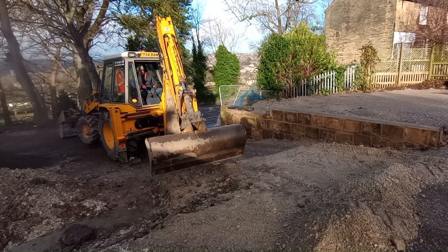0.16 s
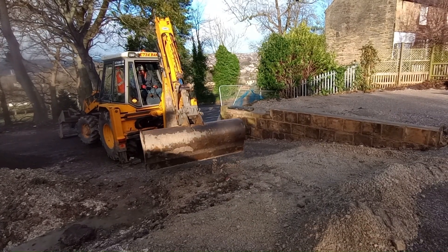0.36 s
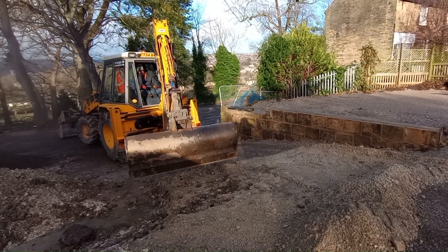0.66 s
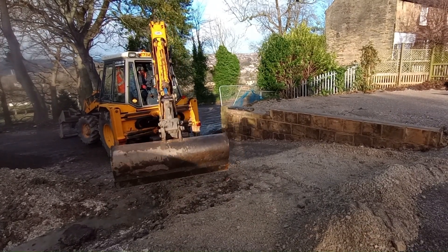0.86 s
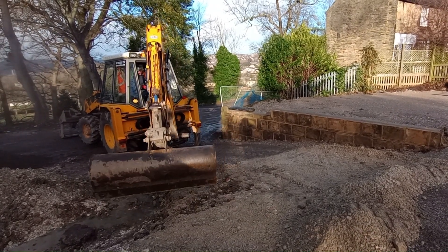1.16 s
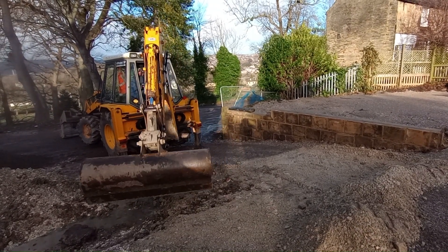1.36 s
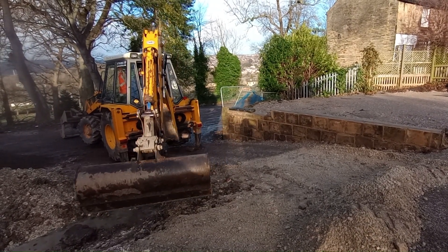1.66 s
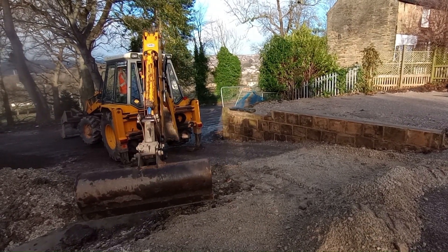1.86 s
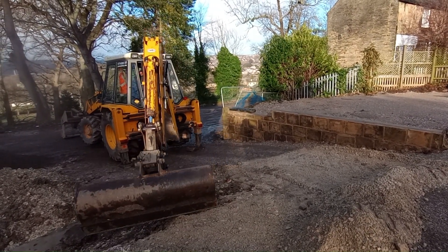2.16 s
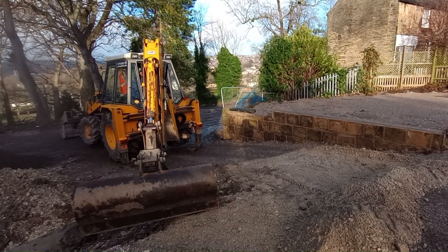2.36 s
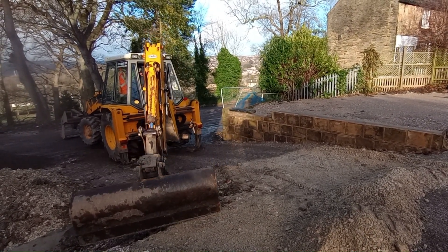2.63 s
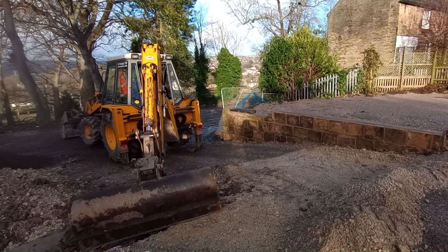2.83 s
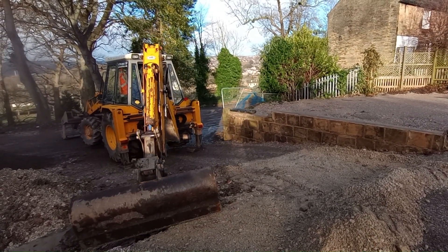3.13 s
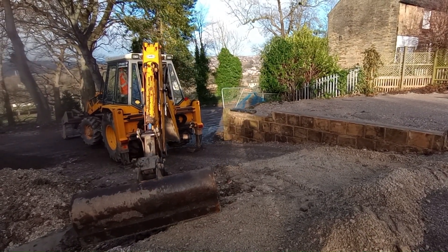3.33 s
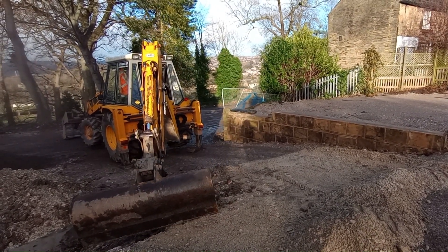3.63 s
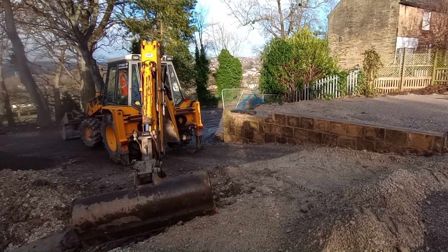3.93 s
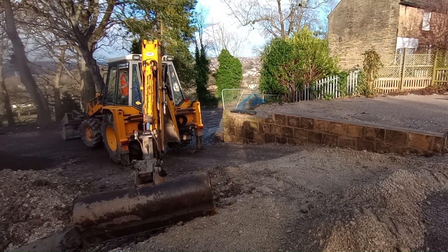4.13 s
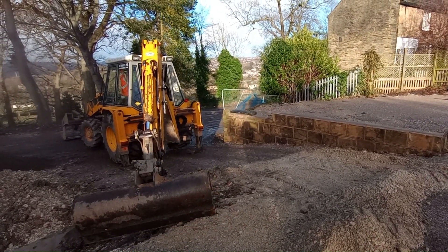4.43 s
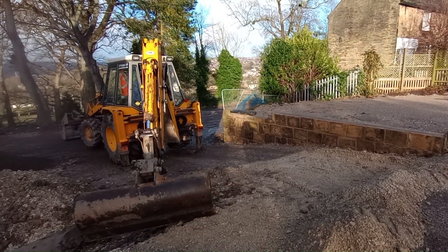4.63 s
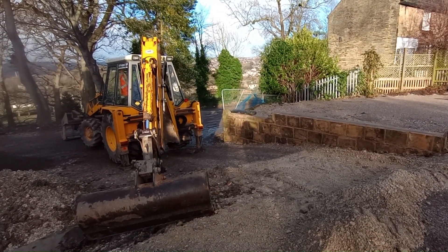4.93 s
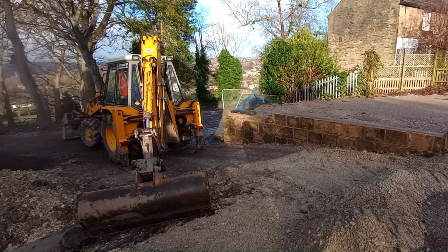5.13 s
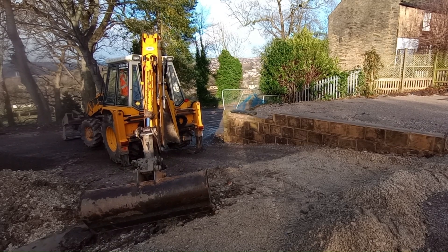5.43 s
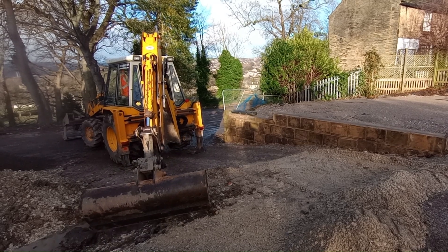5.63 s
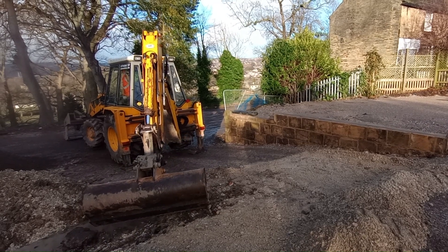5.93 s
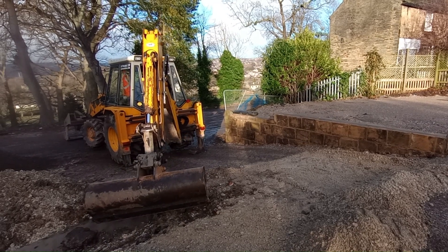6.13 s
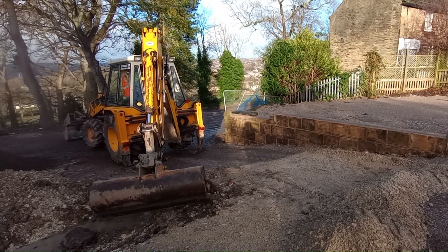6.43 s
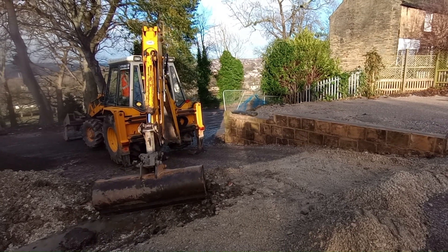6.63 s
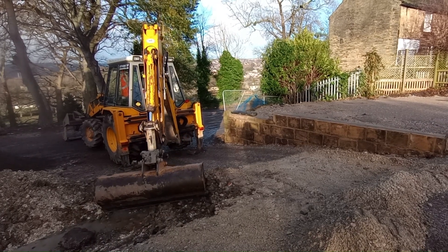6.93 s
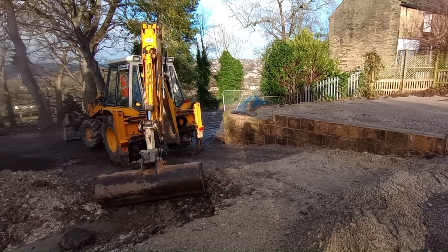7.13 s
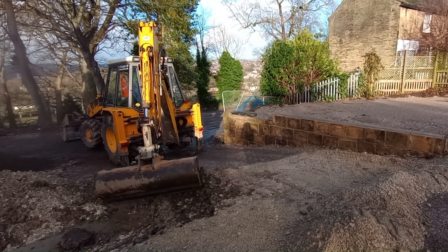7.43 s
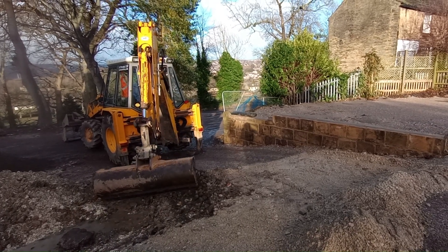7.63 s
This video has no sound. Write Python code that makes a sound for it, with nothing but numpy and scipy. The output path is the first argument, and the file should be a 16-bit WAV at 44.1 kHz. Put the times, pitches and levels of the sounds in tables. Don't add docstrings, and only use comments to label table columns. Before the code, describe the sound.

Outdoors, a digger's diesel drones steadily with swelling hydraulic whine as its bucket drags through stony ground with hollow knocks, crunches and gritty snaps.

```python
import sys
import numpy as np
from scipy import signal
from scipy.fft import rfft, irfft, next_fast_len
from scipy.io import wavfile
from scipy.ndimage import uniform_filter1d

SR = 44100
rng = np.random.default_rng(int(sys.argv[2]) if len(sys.argv) > 2 else 0)


def gain_from_db(level_db):
    decades = np.asarray(level_db, float) / 20
    return 10 ** decades


def store_wav(level_fs):
    pcm = np.round(np.clip(np.atleast_2d(level_fs), -1, 1) * 32767)
    wavfile.write(sys.argv[1], SR, pcm.T.astype(np.int16))


N = 343098

# time in seconds, cylinder firings per second in Hz.
ENGINE_SPEED = [(0.0, 47.3), (0.4, 47.3), (0.9, 48.5), (1.3, 48.0), (2.1, 48.75), (2.45, 47.75),
                (3.0, 49.6), (3.6, 49.5), (4.3, 47.6), (5.1, 47.35), (5.4, 47.9), (6.0, 48.15),
                (6.3, 47.75), (6.9, 48.05), (7.78, 49.0)]
# multiple of the firing rate, rms level in dB.
ENGINE_TONES = [(1, -44), (2, -48), (3, -45.5), (4, -46.5), (7, -52), (8, -54), (10.6, -56), (13.5, -54),
                (14, -50.5), (16, -59), (30.3, -56)]
# time in seconds, level in dB.
CLATTER = [(0.0, -41.5), (0.3, -45), (1.13, -39.5), (1.54, -44.5), (1.86, -40.5), (2.27, -46.5),
           (2.64, -39), (3.25, -45.5), (3.75, -41), (4.12, -41), (5.09, -42), (5.63, -40), (5.92, -40),
           (6.3, -41), (7.06, -39), (7.78, -41)]
# frequency in Hz, level in dB per Hz.
CASING_COLOUR = [(41, -27.5), (70, 4.5), (378, -2), (545, -7), (870, -1), (1000, -5), (1110, -5),
                 (1770, -9.5), (1960, -13), (2710, -17.5), (4600, -39.5), (9000, -56.5), (11700, -99),
                 (19800, -120)]
# pitch in Hz, width in Hz, level over the clatter in dB.
PANELS = [(188, 6, -1), (379.7, 3.8, -9.5), (780, 40, -14), (835, 13, -10), (880, 25, -14.5),
          (1120, 25, -13.5), (1310, 72, -15), (1451, 28, -10.5), (1517, 23, -15.5), (1753, 6.3, -18),
          (1917, 46, -20), (2260, 56, -27.5), (2410, 20, -26.5)]
# start in seconds, end in seconds, tone number, gain in dB.
VALVES = [
    (1.5, 2.35, 0, 5),
    (2.8, 4.65, 0, 6.5),
    (3.8, 4.65, 0, 4.5),
    (5.4, 7.9, 0, 4.5),
    (1.5, 2.35, 1, 11),
    (2.8, 3.95, 1, 11),
    (.7, 1.9, 2, 7),
    (2.8, 4.65, 2, 8),
    (5.4, 7.9, 2, 4.5),
]
# time in seconds, level in dB.
DRAG = [(0, -40.5), (1.86, -35.5), (2.32, -40.5), (2.6, -45), (2.9, -32.5), (3.23, -35.5), (3.6, -33),
        (3.96, -37.5), (4.35, -32), (4.64, -39), (5.03, -36), (5.4, -28), (5.9, -30.5), (6.5, -34.5),
        (6.575, -44), (6.62, -26.5), (7.28, -38), (7.78, -32.5)]
# middle in seconds, length in seconds, scrape in dB, grit in dB.
JOLTS = [(0.126, 0.17, -30, -57), (2.2, 0.13, -32.5, -48.5), (2.48, 0.33, -31.5, -52.5),
         (2.657, 0.031, -35, -35.5), (2.755, 0.15, -25, -44), (3.68, 0.022, -19, -41),
         (3.763, 0.061, -26, -35.5), (3.83, 0.08, -26, -38), (4.39, 0.038, -24, -37.5),
         (4.505, 0.29, -34, -52), (4.736, 0.097, -28, -47), (4.806, 0.067, -21.5, -48),
         (4.957, 0.24, -27.5, -54.5), (5.49, 0.11, -31, -45), (5.696, 0.14, -26.5, -65),
         (6.175, 0.083, -41, -50), (6.354, 0.88, -28.5, -47.5), (6.709, 0.095, -26.5, -62),
         (7.315, 0.11, -24.5, -47), (7.488, 0.18, -30, -46), (7.62, 0.22, -27, -46.5)]
# frequency in Hz, level in dB per Hz.
GRAVEL_COLOUR = [(88, -30), (150, -26.5), (215, -30.5), (372, -1.5), (1320, -9), (2100, -14), (2450, -12.5),
                 (3330, -22), (9000, -65.5), (11700, -102.5), (19800, -120)]
# pitch in Hz, width in Hz, level in dB.
BUCKET_RINGS = [(530, 720, 5), (630, 63, -3.5), (884, 64, 2), (1105, 78, 1.5), (1290, 240, 0.5),
                (1560, 170, -5.5), (2710, 210, -16.5)]
# time in seconds, peak in dB, ring in Hz, gritty edge in dB.
KNOCKS = [(2.651, -8.5, 895, -26), (2.6562, -14.5, 1450, -7), (2.666, -15, 600, -8), (2.775, -20, 870, -31),
          (2.7905, -39.5, 2280, 19), (2.805, -2, 610, -36), (2.807, -7, 1350, -30), (2.817, -13, 890, -29),
          (2.863, -15, 1030, -21), (2.867, -15, 604, -24), (3.41, -20.5, 610, -16),
          (3.508, -12.5, 503, -33), (3.67, -15.5, 1290, -11), (3.685, -15.5, 950, -3),
          (3.8174, -12, 614, -7), (3.84, -5.5, 940, -16), (3.857, -13.5, 410, -35),
          (3.888, -11.5, 1070, -17), (4.39, -20, 1420, -14), (4.694, -16.5, 1230, -12),
          (4.714, -13, 835, -23), (4.741, -13, 970, -24), (4.797, -12, 1120, -17), (4.802, -9, 530, -31),
          (4.811, -10.5, 536, -37), (5.073, -12.5, 1010, -20), (5.15, -16.5, 670, -39),
          (5.159, -16, 1010, -35), (5.406, -15, 610, -16), (5.493, -19, 810, -22),
          (5.528, -8.5, 1290, -10.5), (6.042, -13.5, 796, -19), (6.229, -10.5, 735, -22),
          (6.289, -12.5, 880, -13), (6.4058, -15, 930, -21), (6.596, -9, 945, -17)]
# time in seconds, peak in dB, ring in Hz.
PEBBLES = [(0.465, -24, 980), (2.721, -22.5, 573), (3.745, -22, 454), (3.784, -19, 706), (3.835, -14, 410),
           (4.108, -32, 820), (4.362, -24, 630), (4.405, -35, 1230), (4.535, -18.5, 890), (4.673, -23, 810),
           (4.88, -20, 700), (4.931, -21, 680), (5.058, -18.5, 790), (5.095, -17.5, 645),
           (5.244, -20.5, 666), (5.352, -20.5, 890), (5.57, -16, 880), (5.699, -24, 1090),
           (5.734, -15.5, 700), (5.849, -24, 490), (5.928, -16, 620), (5.949, -21, 690), (6.013, -21, 496),
           (6.122, -28, 453), (6.202, -17.5, 493), (6.27, -16, 900), (6.315, -22, 950), (6.33, -16, 470),
           (6.349, -15.5, 760), (6.37, -29, 674), (6.462, -17.5, 497), (6.501, -20.5, 472),
           (6.695, -21, 885), (6.73, -19, 607), (6.786, -28, 1160), (6.85, -18.5, 880), (6.898, -20, 395),
           (6.957, -29, 440), (7.035, -16.5, 660), (7.247, -25, 670), (7.368, -19.5, 770),
           (7.486, -22, 494), (7.612, -13.5, 890), (4.459, -21, 1200), (4.466, -23, 900),
           (5.372, -19.5, 517), (5.617, -25, 498), (5.773, -19.5, 600), (6.788, -17.5, 700),
           (7.072, -25, 593)]
# time in seconds, peak in dB.
CHIPS = [(4.4249, -48), (4.76, -28), (4.8799, -49), (5.202, -30), (5.243, -40), (5.3299, -46),
         (5.4321, -36), (5.5777, -40), (5.8536, -22.5), (5.908, -28), (6.122, -30), (6.1746, -26),
         (6.262, -26.5), (4.455, -41), (5.257, -32), (5.2822, -40), (6.1902, -31), (6.2141, -36),
         (6.3249, -38), (6.4336, -43), (7.48, -40), (7.6788, -38), (2.764, -32), (0.519, -32), (3.835, -24),
         (3.845, -21.5), (3.853, -24), (4.796, -33), (4.805, -33), (4.7185, -24), (5.7, -42), (5.7347, -29),
         (6.459, -27), (3.769, -33), (3.7553, -24), (6.3471, -42), (6.5232, -33), (6.64, -41),
         (6.6808, -35), (6.88, -41), (7.188, -47), (7.3664, -35), (7.4645, -47), (7.5847, -33),
         (7.6366, -49)]
# time in seconds, peak in dB.
CRUNCHES = [(3.7447, -40), (3.767, -42), (3.7896, -39), (3.846, -42), (3.855, -50), (4.365, -39),
            (4.3863, -37), (4.3915, -40), (4.407, -44), (4.6716, -49), (4.759, -44), (4.8801, -41),
            (5.2024, -48), (5.407, -46), (5.4324, -43), (5.4783, -34), (5.6838, -48), (5.7172, -44),
            (5.7357, -44), (5.8534, -44), (6.1223, -43), (6.1737, -40), (6.1977, -38), (6.4246, -50),
            (6.4606, -43), (6.6401, -41), (6.7684, -50), (6.8497, -46), (7.1874, -40), (7.6126, -39)]
# time in seconds, peak in dB, lower part in dB.
SNAPS = [(2.655, -65.5, 29), (2.793, -72, 21), (3.685, -53, 12), (3.7532, -48, 6), (3.8313, -55, 23),
         (3.888, -50.5, 15), (4.3647, -55, 22), (4.3915, -57, -1), (4.455, -53, 12), (4.693, -62, 12),
         (4.722, -52, 25), (4.789, -56, 7), (5.3473, -48.5, 8), (5.459, -45, 8), (5.5038, -48.5, 29),
         (5.527, -51, 31), (5.538, -41.5, 10), (5.6313, -55, 16), (5.846, -61, 16), (6.0428, -48.5, -2),
         (6.166, -53, 11), (6.1828, -48.5, 12), (6.2124, -52, 3), (6.29, -50.5, 10), (6.456, -49.5, 20),
         (6.696, -33.5, 16), (6.708, -42.5, 8), (7.3085, -39, 15), (7.336, -45, 0), (7.4984, -42.5, 9)]
# time in seconds, peak in dB, lower part in dB.
MORE_SNAPS = [(0.798, -56.5, 1), (2.782, -52, 6), (3.8167, -55, 18), (3.8357, -49, 18), (4.402, -49, 12),
              (5.6401, -48, 6), (5.929, -55, 12), (6.142, -47.5, 6), (6.349, -57, 18), (6.3964, -58, 14),
              (6.5266, -57.5, 12), (6.5974, -54.5, 12), (6.883, -51, 20), (6.968, -55, 5), (7.1886, -58, 14),
              (7.3143, -43, 10), (7.4774, -57, 16), (7.584, -54.5, 14), (7.7368, -48.5, 5), (5.885, -51, 8),
              (5.911, -55, 5), (6.613, -51, 8), (6.662, -53, 2), (6.686, -52, 4), (6.725, -50.5, 0),
              (6.793, -52, 4), (7.2936, -56, 4), (7.754, -52, 2)]
# time in seconds, length in seconds, pitch in Hz, level in dB,
# second partial in dB.
SQUEAKS = [
    (3.666, 0.027, 1271, -26, -32),
    (7.583, 0.049, 640.5, -27.5, -25),
]
# time in seconds, peak in dB, pitch in Hz.
THUMPS = [(0.042, -18, 140), (0.071, -15, 115), (0.122, -14, 156), (0.647, -19, 153), (0.818, -21.5, 202),
          (1.045, -30, 151), (1.275, -19, 88.5), (1.689, -16, 101), (1.949, -20, 100.5), (2.065, -19, 129),
          (2.136, -17.5, 188), (2.318, -19.5, 138), (2.423, -8.5, 226), (2.503, -19.5, 175),
          (2.766, -20, 181), (2.886, -24, 108), (3.014, -18.5, 290), (3.824, -13.5, 138), (4.666, -17, 128),
          (4.72, -14.5, 117), (4.799, -10.5, 129), (5.188, -17, 146), (5.339, -20, 142), (5.405, -12, 139),
          (5.489, -14, 126), (5.528, -11.5, 153), (5.608, -19, 132), (5.761, -15.5, 169), (6.041, -20, 121),
          (6.142, -17, 147), (6.22, -14, 128), (6.353, -15, 137), (6.593, -27, 143), (6.722, -15, 126),
          (6.832, -16, 139), (6.895, -14, 123), (7.03, -18, 98), (7.419, -21, 98), (7.537, -16, 169),
          (7.612, -18, 83.4)]
# time in seconds, level in dB, depth in octaves below the flutter.
BREEZE = [(0.0, -19.5, 1.4), (0.4, -33, 0.18), (0.8, -27, 0.62), (1.3, -38, 2), (1.55, -30, 1.16),
          (2.0, -28, 1.3), (2.3, -29, 0.68), (2.95, -30, 0.72), (3.2, -51, 0.69), (4.3, -47, 1.4),
          (4.6, -39.5, 1.2), (5.3, -28.5, 0.42), (5.9, -31, 0.29), (6.6, -32.5, 0.36), (7.2, -30, 1.54),
          (7.78, -26, 0.71)]
# middle in seconds, length in seconds, level in dB,
# depth in octaves below the flutter.
GUSTS = [(0.282, 0.07, -27, 1.3), (0.13, 0.2, -20.5, 0.67), (0.622, 0.36, -30, 1.36),
         (0.71, 0.13, -28, 2.6), (0.837, 0.16, -34, 0.2), (1.11, 0.3, -24.5, 0.51),
         (1.356, 0.23, -20.5, 0.6), (1.44, 0.044, -45, 1.1), (1.718, 0.14, -25, 1.2),
         (2.07, 0.068, -62, 1.1), (2.225, 0.19, -24.5, 1.7), (2.478, 0.29, -21, 0.084),
         (2.923, 0.16, -25, 1.34), (3.648, 0.11, -30.5, 2.3), (3.84, 0.28, -22, 0.25),
         (4.01, 0.41, -42, 1.5), (4.518, 0.19, -28, 0.45), (4.74, 0.11, -26.5, 0.46),
         (4.826, 0.15, -21.5, 0.27), (4.983, 0.27, -24, 1), (5.46, 0.36, -28.5, 0.27),
         (5.7, 0.39, -28, 0.25), (6.277, 0.56, -31.5, 0.52), (6.405, 0.31, -31, 0.1),
         (6.61, 0.059, -26, 0.34), (6.875, 0.67, -32, 0.47), (7.054, 0.06, -26, 1.1),
         (7.373, 0.096, -45, 2.5), (7.622, 0.2, -30.5, 0.66)]
# frequency in Hz, level in dB per Hz.
HISS_COLOUR = [(4500, -10.5), (6500, -16), (9000, -2), (13000, 2.5), (15700, 1.5)]
# middle in seconds, length in seconds,
# level over the hiss in dB.
SPRAYS = [(1.05, 0.92, 6.5), (4.52, 0.22, 7), (4.735, .07, 4), (4.8, .05, 4), (4.96, 0.11, 3),
          (5.27, .12, 0), (5.48, .08, 7), (5.54, .05, 5), (6.18, .1, 3), (6.705, 0.046, 2), (6.88, .1, 3),
          (7.312, .04, 6), (7.585, .08, 3)]


def engine(gate=0.26, knock_s=0.014, clatter_db=7.5, follow=0.46):
    turns = np.cumsum(curves(ENGINE_SPEED)[0]) / SR
    level_db = curves(CLATTER)[0]

    def tone(order, db):
        loudness = np.sqrt(2) * gain_from_db(db + 1.5 * wander(4))
        return loudness * np.sin(2 * np.pi * (order * turns + rng.random()))

    exhaust = sum(tone(order, db) for order, db in ENGINE_TONES)
    pump = sum(tone(order, db) for order, db in zip((5, 6, 10), valves()))

    cylinder = gain_from_db([-13.5, -25.5, -17.5, -4.0])[turns.astype(int) % 4]
    dying = np.exp(-(turns % 1) / (49 * knock_s))
    flare = 1 - gate + gate * 2 * cylinder * dying
    shaking = flare * rng.standard_normal(N)
    casing = evened(colour(shaking, CASING_COLOUR))
    flex = 1 + .012 * wander(1.5)
    for hz, width, db in PANELS:
        panel = resonate(shaking, hz * flex, width)
        panel = resonate(panel, hz * flex, 2 * width)
        casing = casing + gain_from_db(db - 7.0) * evened(panel)

    gain = gain_from_db(follow * (level_db - np.median(level_db)))
    return gain * exhaust + pump + gain_from_db(level_db + clatter_db) * casing


def valves(ramp_s=.3):
    t = np.arange(N) / SR
    levels = np.outer([-50.5, -52.5, -51], np.ones(N))
    for start, end, which, db in VALVES:
        nearest_end = np.minimum(t - start, end - t)
        levels[int(which)] += db * np.clip(nearest_end / ramp_s + .5, 0, 1)
    return levels


def scrape(per_s=600, spread_db=-0.5, clump_db=1.5, chink_db=-7, ring_db=-4, trim_db=-1.5, grit_db=-3):
    level, bright = bite()
    hits = rng.random(N) < per_s / SR
    blows = hits * gain_from_db(spread_db * np.minimum(rng.exponential(1, N), 3)) * rng.standard_normal(N)
    dug = np.clip(np.arange(N) / SR - 4.6 + 1, .3, 1)
    rough = 1.5 * (1 - dug) * rng.standard_normal(N) + .6 * rng.standard_normal(N)
    blows = (dug * evened(blows) + rough) * gain_from_db(clump_db * wander(35))

    rings = np.zeros(N)
    for hz, width, db in BUCKET_RINGS:
        ring = resonate(resonate(blows, hz, width), hz, 4 * width)
        rings += gain_from_db(db) * evened(ring)
    stones = evened(colour(blows, GRAVEL_COLOUR)) + gain_from_db(ring_db) * evened(rings)

    low = evened(band(stones, 280, 2000, order=4))
    grit = evened(band(stones, 2100, 6000, order=3))
    chink = resonate(blows, 2500 * 2 ** (.07 * wander(12)), 140)
    grit = evened(grit + gain_from_db(chink_db) * evened(chink))
    return gain_from_db(trim_db - 4.0) * level * low + gain_from_db(grit_db) * bright * grit


def bite(grit_below_db=-16):
    drag = gain_from_db(curves(DRAG)[0])
    jolts = sum(np.outer(gain_from_db(np.array(dbs)), swell(s, length)) for s, length, *dbs in JOLTS)
    return drag + filled(jolts[0]), gain_from_db(grit_below_db) * drag + filled(jolts[1])


def knocks(rise_s=0.00048, strike=1.0, t60=0.043, ring=0.31, edge_t60=0.02, ring_width=90):
    out, t = np.zeros(N), np.arange(5000) / SR
    push = -strike * np.exp(-((t - .0012) / .00018) ** 2)
    rise = 1 - np.exp(-t / rise_s)
    rows = [(*row, 1) for row in KNOCKS]
    rows += [(*row, -21, .25) for row in PEBBLES]
    for (s, db, hz, edge_db, hard), chance in zip(rows, rng.standard_normal((len(rows), 5000))):
        rattle = gain_from_db(-60 * t / t60) / (1 + hard) + .12 * gain_from_db(-60 * t / .15)
        blow = hard * push + chance * rise * rattle
        wide = band(blow, 0.45 * hz, 1.885 * hz, order=4)
        body = peaked(peaked(wide) + ring * peaked(resonate(wide, hz, ring_width)))
        thud_db = -24 - db + 0.1 * (db + 15)
        thud = gain_from_db(thud_db) * peaked(band(blow, 140, 369))
        tick = chance[::-1] * rise * gain_from_db(-60 * t / edge_t60)
        edge = peaked(band(tick, 2600, 3500) + 9.9 * resonate(tick, 2640, 220))
        add(out, s, gain_from_db(db) * (body + thud + gain_from_db(edge_db - 3.5) * edge))
    return out


def chips(per_s=50, crackle_db=1, spread_db=4, trim_db=-3, t60=0.018):
    hits = rng.random(N) < per_s / SR
    train = hits * gain_from_db(crackle_db + spread_db * np.minimum(rng.exponential(1, N), 3))
    train = train * bite()[1] * gain_from_db(1) * (np.arange(N) > 4.35 * SR)
    for s, db in CHIPS:
        train[round(s * SR)] = gain_from_db(db + trim_db)
    shape = signal.oaconvolve(train, gain_from_db(-60 * np.arange(900) / SR / t60))[:N]
    noise = shape * rng.standard_normal(N)
    return gain_from_db(-6.0) * band(noise, 3100, 3900) + gain_from_db(14.5) * band(noise, 570, 2025)


def crunch(t60=.014, trim_db=-3):
    out, t = np.zeros(N), np.arange(700) / SR
    shape = gain_from_db(-60 * t / t60) * (1 - np.exp(-t / .0003))
    for (s, db), chance in zip(CRUNCHES, rng.standard_normal((len(CRUNCHES), 700))):
        crack = band(chance * shape, 2600, 4330, order=3)
        add(out, s, gain_from_db(db + trim_db) * peaked(crack))
    return out


def snaps(rows):
    out, t = np.zeros(N), np.arange(600) / SR
    shape = gain_from_db(-60 * t / .009) * (1 - np.exp(-t / .0003))
    for (s, db, lower_db), chance in zip(rows, rng.standard_normal((len(rows), 600))):
        top = peaked(band(chance * shape, 7000, 16000, order=3))
        lower = peaked(band(chance * shape, 3000, 5500, order=3))
        add(out, s, gain_from_db(db - 12.0) * (top + gain_from_db(lower_db - 7.0) * lower))
    return out


def squeaks(jitter=0.064):
    out = np.zeros(N)
    for s, length, hz, db, second_db in SQUEAKS:
        size = round(length * SR)
        unsteady = evened(uniform_filter1d(rng.standard_normal(4000), 90))
        turns = np.cumsum(hz * (1 + jitter * unsteady))[:size] / SR
        partials = gain_from_db(db) * np.sin(2 * np.pi * turns) + gain_from_db(second_db) * np.sin(4 * np.pi * turns)
        add(out, s, signal.windows.tukey(size, .5) * partials)
    return out


def thumps(trim_db=-4, rise_s=0.0028, cycles=7):
    out, t = np.zeros(N), np.arange(6000) / SR
    for (s, db, hz), turn in zip(THUMPS, rng.random(len(THUMPS))):
        shape = (1 - np.exp(-t / rise_s)) * gain_from_db(-60 * t * hz / (2 * cycles))
        ring = shape * np.sin(2 * np.pi * (hz * t + turn))
        add(out, s, gain_from_db(db + trim_db) * peaked(ring))
    return out


def rumble(lump_db=1.0, lump_hz=20, boom_hz=132, trim_db=-5.0):
    def share(depth):
        return gain_from_db(-6 * np.subtract.outer([0, .9, 1.7, 2.4], depth) ** 2)

    breeze_db, breeze_depth = curves(BREEZE)
    gains = share(breeze_depth) * gain_from_db(breeze_db)
    gusts = sum(np.outer(gain_from_db(db) * share(depth), swell(s, length)) for s, length, db, depth in GUSTS)
    gains = gains + [filled(g) for g in gusts]

    eddies = rng.standard_normal(N) * gain_from_db(lump_db * wander(lump_hz))
    flutter = evened(band(eddies, 203.0, 369.0, order=2))
    boom = band(eddies, 99.0, 179.0, order=3)
    boom = evened(boom + .5 * resonate(boom, boom_hz, 34.0))
    deep = evened(band(eddies, 60.7, 106.0, order=3))
    early = np.clip(10 * (5 - np.arange(N) / SR), 0, 1)
    deepest = gain_from_db(-4.5) * early * evened(band(eddies, 36, 63, order=3))
    return gain_from_db(trim_db) * (gains * [flutter, boom, deep, deepest]).sum(axis=0)


def yard(x, t60=.3):
    t = np.arange(SR // 2) / SR
    echoes = rng.standard_normal(len(t)) * (rng.random(len(t)) < .05)
    tail = echoes * gain_from_db(-60 * t / t60) * (t > .006)
    return signal.oaconvolve(x, tail / np.linalg.norm(tail))[:N]


def chirps(hz=8990, length_s=.024, db=-73):
    out, t = np.zeros(N), np.arange(0, length_s, 1 / SR)
    for s in (6.664, 7.052):
        add(out, s, gain_from_db(db) * signal.windows.tukey(len(t), .5) * np.sin(2 * np.pi * hz * t))
    return out


def hiss(level_db=-84, follow=.6, spray_per_grit=0.23):
    gain_db, grit = curves(CLATTER)[0], bite()[1]
    air = gain_from_db(level_db + follow * (gain_db - np.median(gain_db)) + 1.1 * wander(6))
    air = air * (grit / np.median(grit)) ** spray_per_grit
    air = air * gain_from_db(filled(sum(db * swell(s, length) for s, length, db in SPRAYS)))
    return air * evened(colour(rng.standard_normal(N), HISS_COLOUR))


def evened(x):
    return x / np.sqrt(np.mean(x ** 2) + 1e-20)


def peaked(x):
    return x / abs(x).max()


def curves(rows):
    s, *columns = np.transpose(rows)
    return [np.interp(np.arange(N) / SR, s, c) for c in columns]


def swell(middle, length):
    t = np.arange(N // 64 + 1) * 64 / SR
    return np.cos(np.pi * np.clip((t - middle) / length, -.5, .5)) ** 2


def filled(x):
    return np.interp(np.arange(N) / 64, np.arange(len(x)), x)


def wander(hz):
    steps = rng.standard_normal(N // 64 + 2)
    smooth = signal.sosfiltfilt(signal.butter(2, hz, fs=SR / 64, output="sos"), steps)
    return filled(evened(smooth))


def colour(x, points):
    f, db = np.transpose(points)
    size = next_fast_len(len(x))
    hz = np.fft.rfftfreq(size, 1 / SR) + 1
    gain = gain_from_db(np.interp(np.log(hz), np.log(f), db, left=-90, right=-90))
    return irfft(rfft(x, size) * gain, size)[:len(x)]


def band(x, lo_hz, hi_hz, order=2):
    edges = [lo_hz, min(hi_hz, .49 * SR)]
    return signal.sosfilt(signal.butter(order, edges, "bandpass", fs=SR, output="sos"), x)


def resonate(x, hz, width):
    turn = np.exp(2j * np.pi * np.cumsum(hz * np.ones(len(x))) / SR)
    r = np.exp(-np.pi * width / SR)
    return 2 * (turn * signal.lfilter([1 - r], [1, -r], x / turn)).real


def add(mix, s, sound):
    part = mix[round(s * SR):][:len(sound)]
    part += sound[:len(part)]


def scene():
    dull = signal.butter(3, 4300, fs=SR, output="sos")
    steel = signal.sosfilt(dull, knocks() + squeaks() + chips())
    digging = scrape() + steel + snaps(SNAPS)
    echoes = gain_from_db(-9) * yard(digging)
    small = snaps(MORE_SNAPS) + crunch() + chirps()
    return (engine() + digging + echoes + rumble() + thumps() + small)[None]


def top_cut(x):
    return signal.sosfilt(signal.butter(12, 15720, fs=SR, output="sos"), x)


def record(dry):
    fade_in = np.minimum(np.arange(N) / 100, 1)
    wind_cut = signal.butter(3, 42, "highpass", fs=SR, output="sos")
    finished = signal.sosfilt(wind_cut, (dry + hiss()) * fade_in)
    return top_cut(finished)


dry = scene()
out = record(dry)
store_wav(out)
```